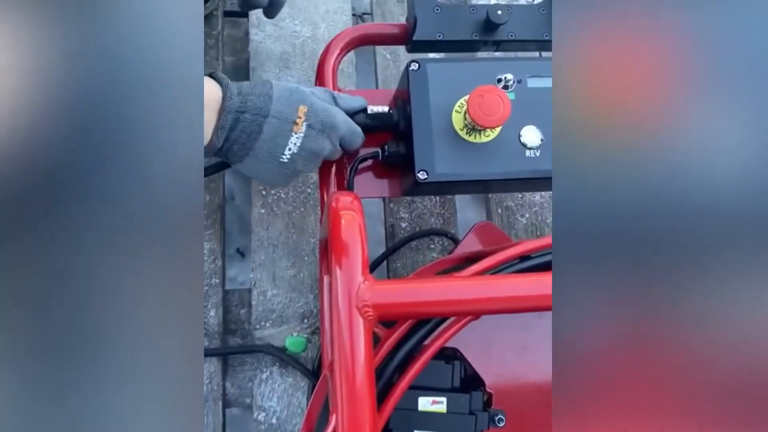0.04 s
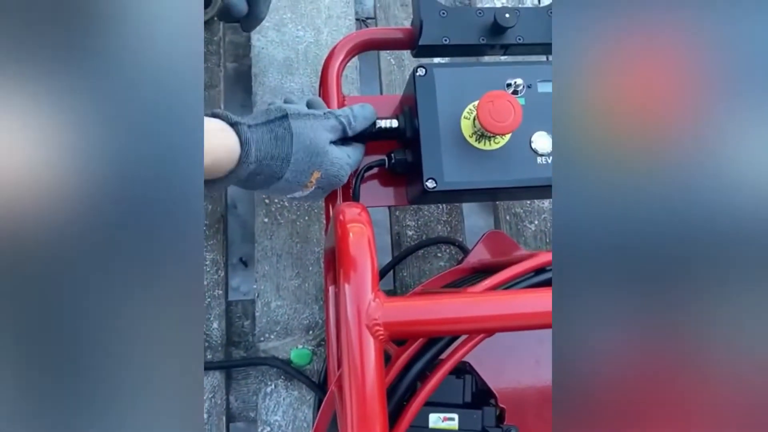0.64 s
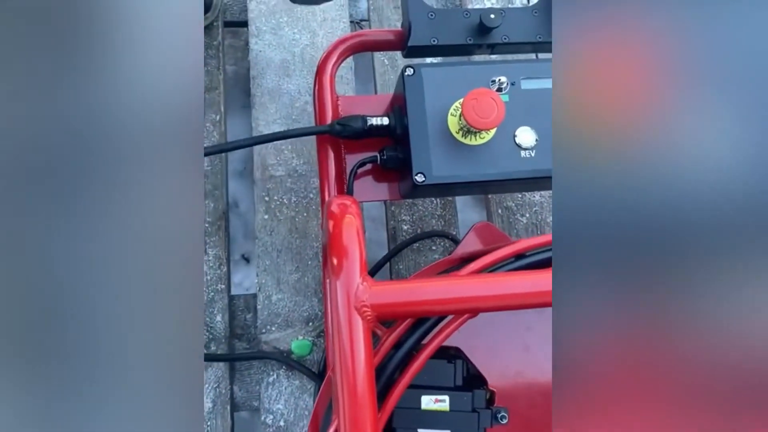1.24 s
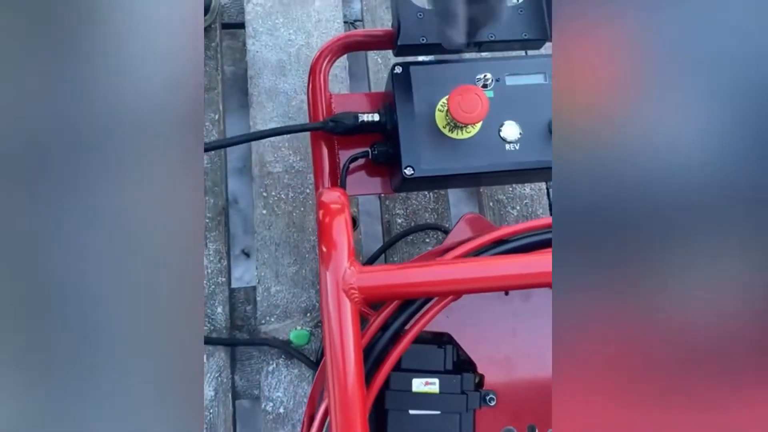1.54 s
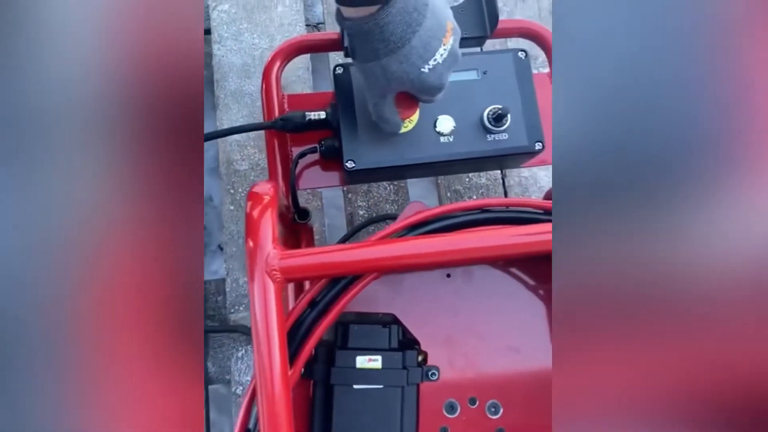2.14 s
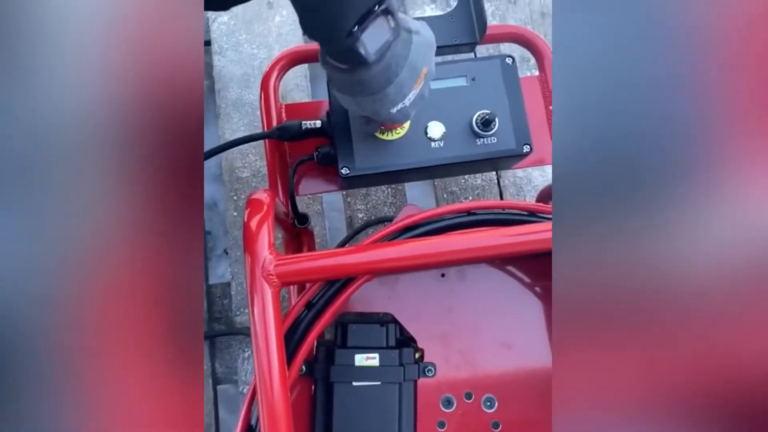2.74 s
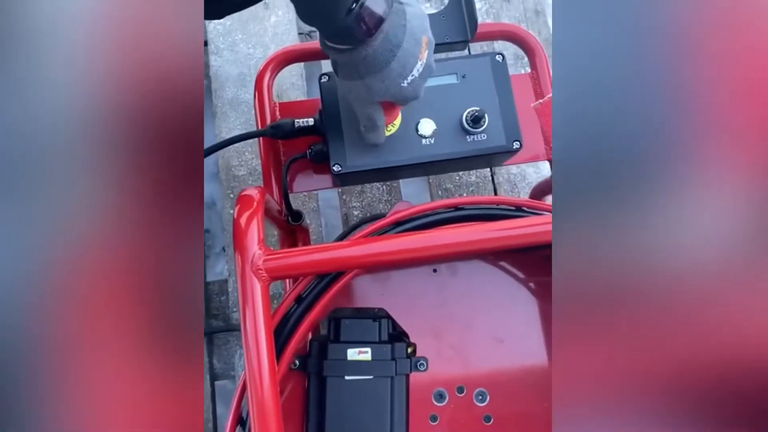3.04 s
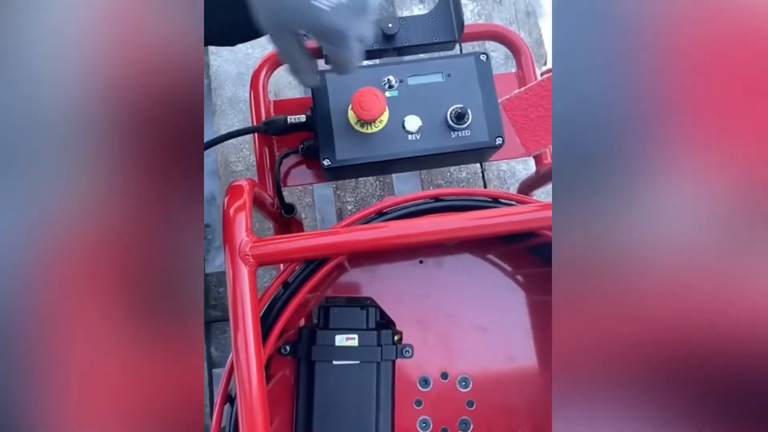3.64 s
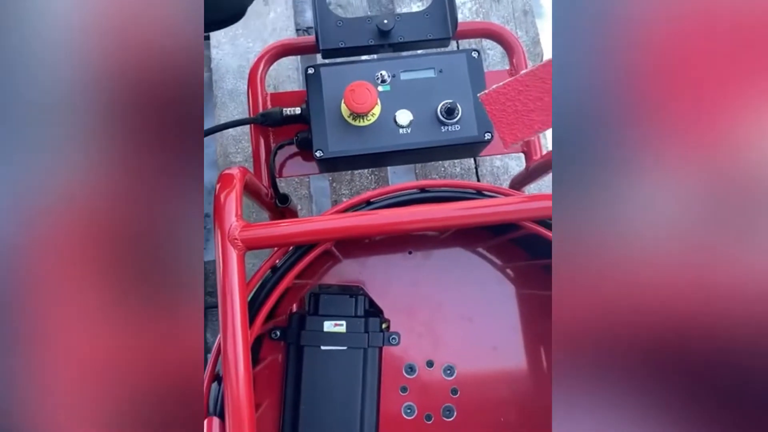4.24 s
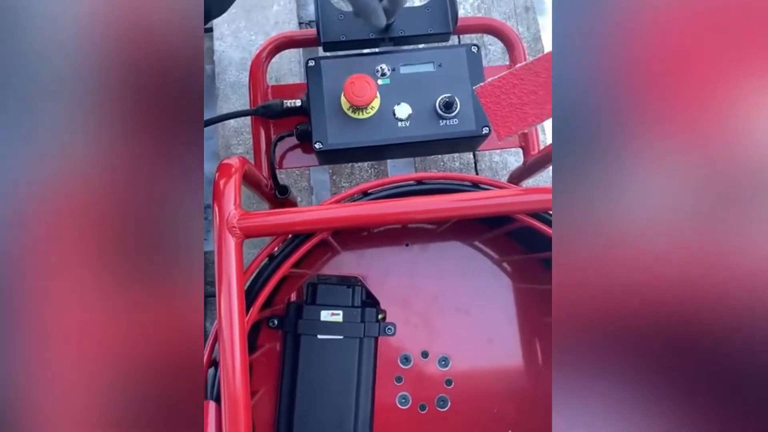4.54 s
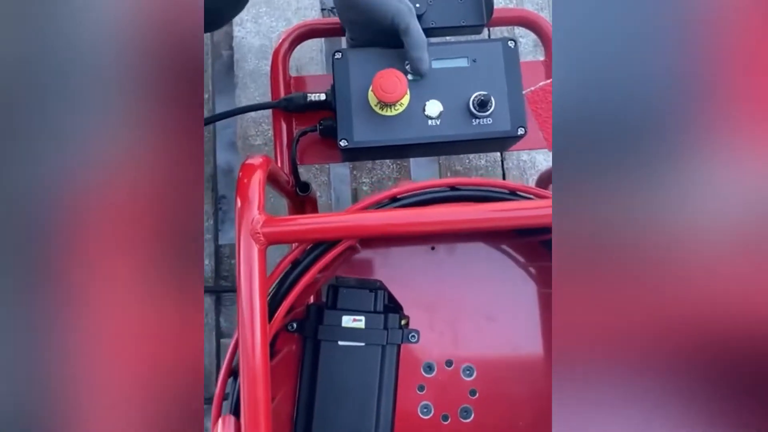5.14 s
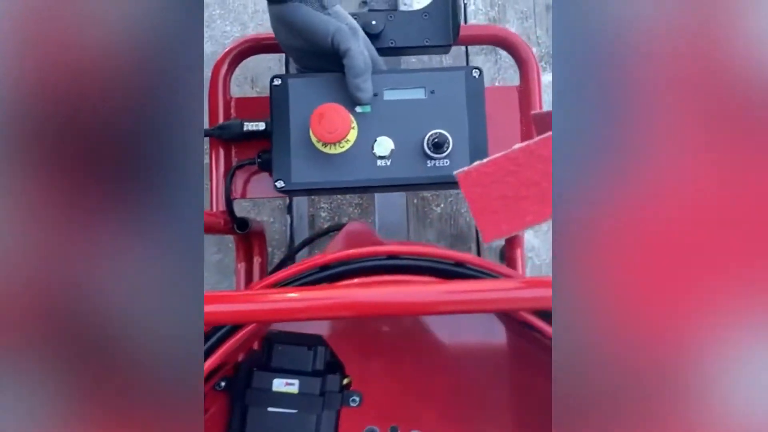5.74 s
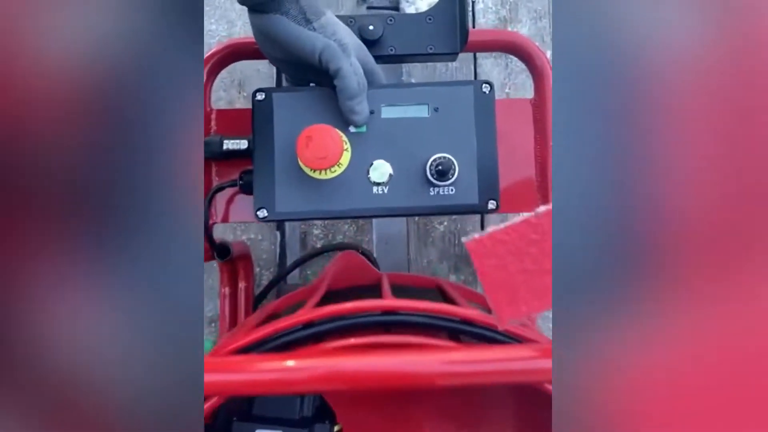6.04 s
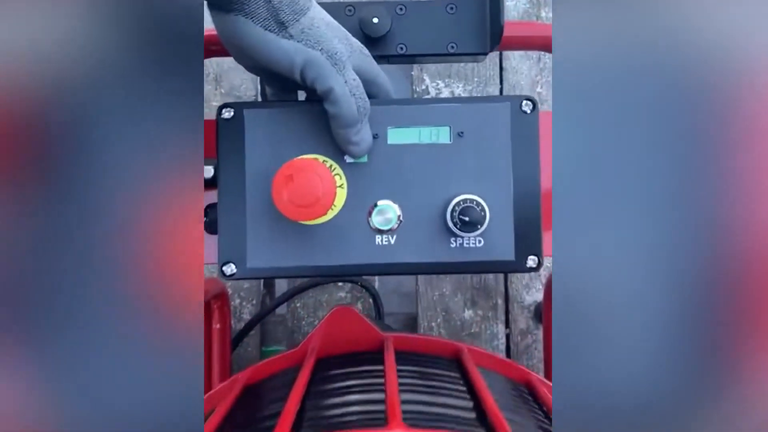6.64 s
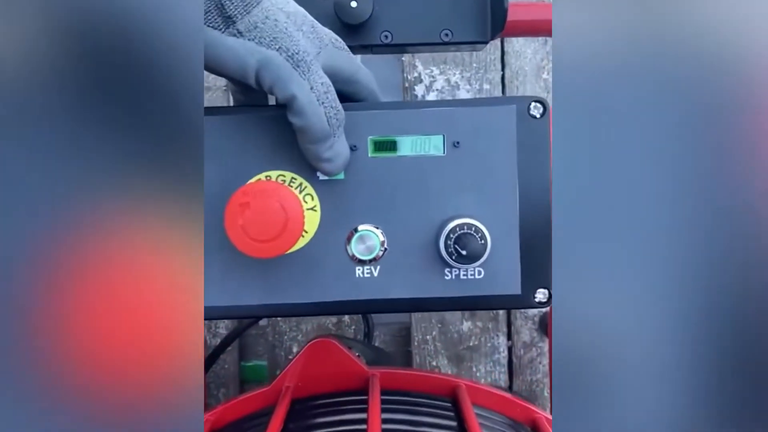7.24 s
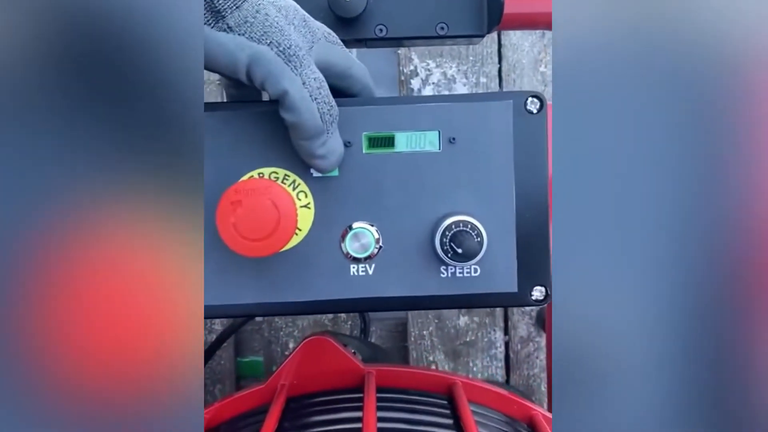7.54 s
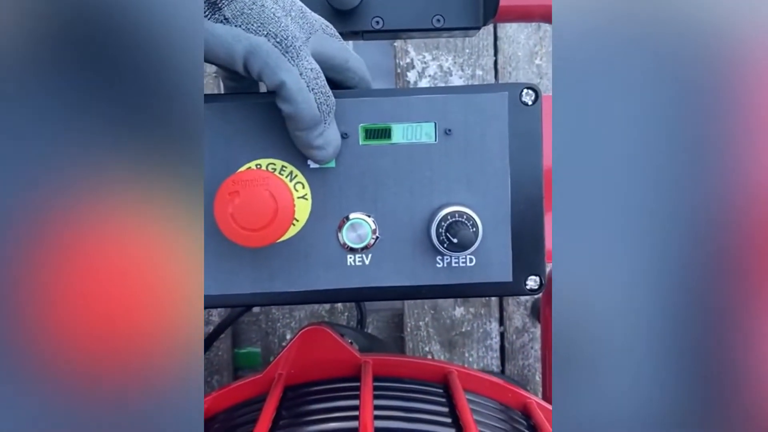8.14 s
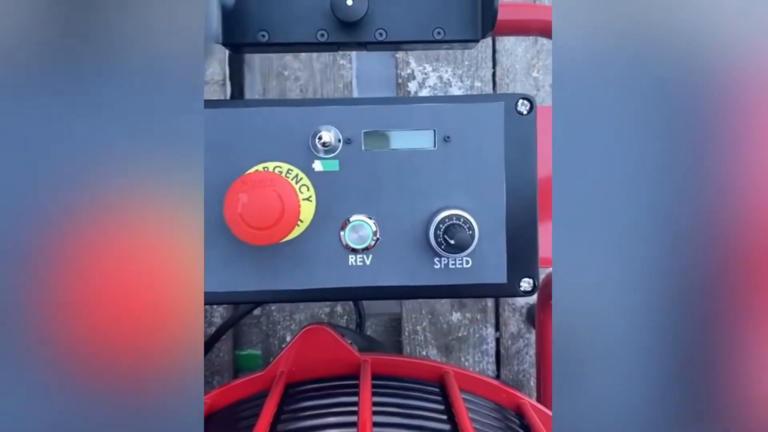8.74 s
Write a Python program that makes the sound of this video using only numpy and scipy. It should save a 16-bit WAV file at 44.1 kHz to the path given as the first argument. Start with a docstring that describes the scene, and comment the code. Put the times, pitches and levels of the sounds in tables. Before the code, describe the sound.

Close up and outdoors, a gloved hand handles a machine's plastic control panel, with soft rustles, fingertip taps and dull bumps. A plug snaps into place first; then a stop button is pushed and twisted loose, giving two sharp, hollow clacks with little ticks around them. The scuffing carries on, dies down briefly, and ends with a switch being pressed and released. A low rumble, hiss and a very faint distant whine lie behind.

```python
"""Outdoors, a gloved hand readies a cable-reel machine whose motor stays off.
First a plug latches into the plastic control box. At 2.6 s the stop button is pushed in, then twisted
free, each clack ringing the box and swaying its steel frame. Glove and sleeve rub and tap on the box,
which knocks dully on the frame. After a lull, at 8.4 s, a power switch is pressed and let go.
Behind it all lie a quiet rumble and hiss, and a faint far whine comes and goes."""
import sys
import numpy as np
from scipy import signal
from scipy.fft import rfft, irfft, next_fast_len
from scipy.io import wavfile

SR = 44100
rng = np.random.default_rng(int(sys.argv[2]) if len(sys.argv) > 2 else 0)


def wrap_up_sound(samples):
    """Save the sound to the file named by the first command line argument, as 16-bit audio."""
    columns = np.atleast_2d(samples).T
    # keep every value between -1 and 1, then stretch to whole-number steps
    tamed = np.clip(columns, -1, 1)
    steps = np.round(tamed * 32767).astype(np.int16)
    wavfile.write(sys.argv[1], SR, steps)


N = 388061
TIME = np.arange(N) / SR


# Modes of the control box. Each row: frequency in Hz, level in dB, decay time (t60) in seconds.
BOX_MODES = [(239, -15.5, 0.043), (346.4, -29.5, 0.16), (528, -28.5, 0.13), (670, -2.5, 0.015),
             (729, -20.5, 0.069), (964, -26, 0.041), (1036, 3.5, 0.00491), (1310, -34.5, 0.18),
             (1462, -28, 0.025), (1770, -0.5, 0.012), (2050, -6, 0.023), (2337, -11.5, 0.015),
             (2783, -23.5, 0.034), (3860, -25, 0.044), (4520, -15.5, 0.0232), (4940, -21, 0.013),
             (5400, -34, 0.06), (6000, -18.5, 0.0052), (8100, -7.5, 0.015), (10100, -5.5, 0.0036)]
# Contacts inside the stop button. Each row: start in seconds, ring in dB, cut-off in Hz, crack in dB.
STOP_CONTACTS = [(2.58807, -16, 9790, -15), (2.5902, 3, 703, -27.5), (2.59279, -12, 1482, -35.5),
                 (2.60664, -16, 611, -44), (3.3035, -27.5, 1217, -46.5), (3.308, -27.5, 1500, -41),
                 (3.31606, -33.5, 11290, -22.5), (3.32086, -1, 2770, -25.5), (3.32567, -37.5, 6270, -29),
                 (3.33938, -35, 1735, -35.5)]

def stop_button():
    """Impact excitation: the button's contacts ring the box; the bass is left to the frame."""
    clacks = mechanism(STOP_CONTACTS, BOX_MODES, crack_t60=0.027, crack_low_hz=1510)
    return butter(clacks, 490, "high")


# Lowest modes of the steel frame. Each row: frequency in Hz, level in dB, t60 in seconds.
FRAME_MODES = [(248, -4.5, 0.056), (336.3, -9, 0.05)]
# Clacks of the stop button taken up by the frame. Each row: start in seconds, peak in dB.
FRAME_SWAYS = [(2.591, -24.5), (3.298, -35), (3.323, -25.5)]

def frame_sway(rise_s):
    """Inertia: the heavy frame is slow to answer, so its low thud swells after the clack."""
    out, thud = np.zeros(N), ring(FRAME_MODES, scatter_db=-1.5)
    thud = peak_one(thud * onset(rise_s, len(thud)))
    for s, db in FRAME_SWAYS:
        add(out, s, from_db(db) * thud)
    return out


# Catches of the stop button's latch as it is pushed, twisted and let go.
# Each row: start in seconds, level in dB, pitch in Hz, bright edge in dB relative to the click.
LATCH_CATCHES = [(2.5877, -20.5, 2550, 2), (2.734, -34.5, 2000, 0.5), (2.843, -43, 1701, -0.5),
                 (2.895, -41.5, 2100, -1), (2.962, -35.5, 1980, -5), (2.994, -38, 1770, -0.5),
                 (3.018, -45.5, 1700, 3), (3.051, -41.5, 2250, -8), (3.091, -44.5, 1716, -1),
                 (3.127, -42.5, 1500, 1.5), (3.185, -39, 2000, -1.5), (3.2656, -24, 1850, -1),
                 (3.285, -42, 1613, 4.5), (3.397, -38, 1750, -2), (3.417, -44.5, 1900, -3),
                 (3.431, -42.5, 2230, -3), (3.579, -36, 2040, -4), (3.597, -39, 1750, 2),
                 (3.622, -30.5, 1950, -6)]

def catches(edge_hz):
    """Damped vibration: each stiff plastic tooth clicks and dies at once; the box answers with a thud."""
    out = np.zeros(N)
    thud = from_db(-3) * padded_thud(hz=280.4, t60=0.029, rise_s=0.0024)
    for s, db, hz, edge_db in LATCH_CATCHES:
        click = burst(hz, width=1.22, t60=.024)
        edge = from_db(edge_db) * burst(edge_hz, width=1.7, t60=.018)
        add(out, s, from_db(db) * (click + edge + thud))
    return out


# Contacts of the plug's latch. Each row: start in seconds, ring in dB, cut-off in Hz, crack in dB.
PLUG_CONTACTS = [(.1935, -25, 6000, -47), (.204, -10.5, 11000, -19.5), (.2062, -6, 8970, -26),
                 (.2076, -4.5, 4970, -19)]
# Modes of the metal plug. Each row: frequency in Hz, level in dB, t60 in seconds before the hand damps it.
PLUG_MODES = [(335, -30, 0.023), (660, -33.5, 0.045), (1300, -21, 0.011), (1820, -20.5, 0.071),
              (2140, -19.5, 0.016), (2820, -28.5, 0.078), (3800, -15.5, 0.027), (4220, -16.5, 0.015),
              (4620, -13.5, 0.025), (4820, -22, 0.017), (5200, -8, 0.016), (5700, -10, 0.013),
              (6120, -9, 0.037), (8000, -5.5, 0.011), (10300, -16, 0.011), (11000, -10, 0.017)]

def plug(grip_t60):
    """Damping: the latch rings the plug, and the hand round it lets no mode outlast grip_t60."""
    held_modes = [(hz, db, min(t60, grip_t60)) for hz, db, t60 in PLUG_MODES]
    return mechanism(PLUG_CONTACTS, held_modes, crack_t60=0.027, crack_low_hz=1100)


# Contacts of the switch, then of its cap. Each row: start in seconds, ring in dB, cut-off in Hz, crack in dB.
PRESS_CONTACTS = [(8.3977, -17, 9170, -38), (8.4008, -30, 8000, -29)]
RELEASE_CONTACTS = [(8.4785, -27.5, 9000, -30)]
# Modes of the switch, then of its cap. Each row: frequency in Hz, level in dB, t60 in seconds.
SWITCH_MODES = [(1466, -9.5, 0.033), (1790, -7, 0.023), (1960, -23, 0.055), (2440, -6, 0.0062),
                (3430, -9, 0.029), (3830, -9.5, 0.02), (5440, -7.5, 0.013), (8330, -6.5, 0.019),
                (9800, 0, 0.0065)]
CAP_MODES = [(2440, -4.5, 0.017), (4580, -5, 0.016)]

def power_switch():
    """Free vibration: the switch rings when pressed, and its cap on landing back on its seat."""
    press = mechanism(PRESS_CONTACTS, SWITCH_MODES, crack_t60=0.0098, crack_low_hz=1430)
    release = mechanism(RELEASE_CONTACTS, CAP_MODES, crack_t60=0.011, crack_low_hz=3000)
    return press + release


def mechanism(contacts, modes, crack_t60, crack_low_hz):
    """Contact stiffness sets bandwidth: sprung parts hit the same stops, and softer hits are duller."""
    out = np.zeros(N)
    response = butter(ring(modes, scatter_db=0), 11000, "low")
    for s, ring_db, soft_hz, crack_db in contacts:
        body = butter(response, soft_hz, "low", order=1)
        snap = butter(crack(crack_t60), crack_low_hz, "high")
        add(out, s, from_db(ring_db) * body + from_db(crack_db) * snap)
    return out


# Fingertips knocking on the box.
# Each row: start in seconds, level in dB, offset of the tick in dB, pitch of the touched spot in Hz.
FINGER_TAPS = [(1.097, -39, -31, 720), (1.534, -25.5, -9, 790), (1.577, -25, -28, 1035),
               (1.601, -23, -25, 807), (1.721, -33, -11.5, 784), (1.872, -21, -17.5, 785),
               (1.913, -33.5, -14, 2240), (2.74, -33, -4, 704), (3.139, -25.5, -20, 730),
               (3.676, -36, -1, 610), (4.374, -25, -35, 612), (4.435, -17, -17, 1185),
               (4.444, -22, -22, 570), (4.908, -23.5, -28, 1226), (5.094, -24.5, -13, 940),
               (5.833, -30.5, -27, 960), (5.874, -29.5, -23, 1103), (6.044, -35, 1.5, 653),
               (8.478, -25, -9.5, 600), (8.667, -32, -6.5, 593), (8.711, -28, -6.5, 635)]

def taps(contact_s, body_db, knock_db, tick_db):
    """Cushioned impact: a gloved touch gives a low body note, a hollow knock and a surface tick."""
    out = np.zeros(N)
    for s, db, tick_offset_db, spot_hz in FINGER_TAPS:
        box = ring(BOX_MODES, scatter_db=-5.5) + from_db(8.5) * crack(t60=0.07)
        spot = ring([(spot_hz, 7.5, 0.042)], scatter_db=0.5)
        landing = 1 - np.exp(-TIME[:len(box)] / contact_s)   # the glove cushions the first instant
        body = butter(box, [130, 400], "band", order=3)
        knock = butter(landing * (box + spot), [450, 2400], "band")
        tick = butter(landing * crack(t60=0.014), 1100, "high")
        tick = butter(tick, 6000, "low", order=1)
        for part, part_db in ((body, body_db), (knock, knock_db), (tick, tick_db + tick_offset_db)):
            add(out, s, from_db(db + part_db) * peak_one(part))
    return out


# Soft bumps against the frame. Each row: start in seconds, peak in dB, pitch in Hz, t60 in seconds.
FRAME_BUMPS = [(1.538, -38, 377, .07), (1.581, -30, 398, 0.079), (1.873, -28.5, 387, 0.041),
               (3.796, -30, 193, 0.056), (3.855, -30.5, 222, 0.39), (3.965, -25.5, 199, 0.15),
               (4.66, -22.5, 165, 0.12), (4.817, -28.5, 161, 0.07), (4.898, -22.5, 183, 0.028),
               (4.924, -15.5, 210, 0.032), (4.942, -33.5, 153, 0.16), (6.368, -39.5, 130, 0.023),
               (8.48, -35.5, 351.6, .06), (8.771, -19.5, 207.6, 0.028)]

def bumps(cushion_s):
    """Damped oscillation: a padded push swells over a few milliseconds and rings away."""
    out = np.zeros(N)
    for s, db, hz, t60 in FRAME_BUMPS:
        add(out, s, from_db(db) * padded_thud(hz, t60, cushion_s))
    return out


# Strokes of glove and sleeve over the box. Each row: fastest moment in seconds, length in seconds,
# level in dB, offset of the box's rumble in dB, offset of the fibres' hiss in dB.
GLOVE_STROKES = [(0.03, 0.36, -52, -9, -3.5), (0.934, 0.19, -45.5, -7.5, -6),
                 (1.247, 0.13, -47.5, -9.5, -6), (1.415, 0.058, -44, -4, -17),
                 (1.533, 0.025, -32.5, -13, -6.5), (1.587, 0.083, -39, 1, -10),
                 (1.722, 0.045, -45.5, 3, -6.5), (2.172, 0.093, -50.5, -2.5, 2),
                 (2.38, 0.14, -46.5, -2.5, -0.5), (2.748, 0.017, -35, -4, -11),
                 (2.825, 0.0071, -39, -12.5, -14.5), (3.334, 0.054, -42.5, 8, -2.5),
                 (3.714, 0.23, -44, -1.5, -3), (3.893, 0.13, -37.5, 0.5, -8),
                 (3.977, 0.039, -29.5, 1.5, -6), (4.443, 0.15, -41.5, 2, -1.5),
                 (4.683, 0.12, -42.5, 1, -6.5), (4.828, 0.061, -38, -3, -5.5),
                 (4.901, 0.028, -37.5, 4.5, -4), (5.092, 0.048, -37.5, 0.5, -5),
                 (5.312, 0.082, -50, -0.5, 5.5), (5.538, 0.14, -47, -2, -1), (5.861, 0.067, -43.5, -2, 0),
                 (6.037, 0.21, -46.5, -1.5, -3), (6.3, 0.2, -52, -1.5, -2),
                 (8.274, 0.028, -49.5, -11.5, -8), (8.386, 0.061, -45.5, -9.5, -7.5),
                 (8.497, 0.091, -47.5, -0.5, -22), (8.76, 0.069, -43.5, 7, -9.5)]
# The sleeve shifts for as long as the arm moves. Each row: time in seconds, level in dB.
SLEEVE_LEVELS = [(0, -77), (.6, -59), (.95, -53.5), (2.0, -52.5), (3.0, -51.5), (4.2, -52.5), (5.5, -52.5),
                 (6.4, -60), (6.95, -58.5), (7.25, -69.5), (7.9, -70), (8.2, -57.5), (8.6, -52.5)]

def rub_strengths():
    """Incoherent sources add in power: sleeve and strokes set the gains of rumble, swish and hiss."""
    sleeve = from_db(np.interp(TIME, *np.transpose(SLEEVE_LEVELS)))
    power = np.outer(from_db([-3, 0, -3.5]), sleeve) ** 2   # rumble, swish, hiss
    for s, length_s, db, rumble_db, hiss_db in GLOVE_STROKES:
        gains = from_db([db + rumble_db, db, db + hiss_db])
        power += np.outer(gains, swell(s, length_s)) ** 2
    return np.sqrt(power)


# Spectrum of the rubbing glove. Each row: frequency in Hz, spectral density in relative dB.
GLOVE_SPECTRUM = [(100, -23), (160, 6.5), (230, 2), (380, 2), (540, -4), (720, -5), (1400, -9), (1900, -8),
                  (2800, -12), (4000, -16), (5200, -17), (7000, -16), (8800, -22), (10700, -23)]

def rubbing(snags_per_s, spread_db, smooth_db, modes_db, shift_db):
    """Sliding friction: fibres snag over a smooth swish; different modes answer as the finger travels."""
    out = np.zeros(N)
    bands = [(130, 450, -3.5), (450, 2500, -6), (2500, 16000, -2.5)]   # rumble, swish, hiss
    for (low_hz, high_hz, band_db), strength in zip(bands, rub_strengths()):
        sizes = from_db(spread_db * np.minimum(rng.exponential(1, N), 4)) * rng.choice([-1, 1], N)
        snags = rms_one(sizes * (rng.random(N) < snags_per_s / SR))
        slips = snags + from_db(smooth_db) * rng.standard_normal(N)
        box = np.zeros(N)
        for hz, _, t60 in BOX_MODES:
            if low_hz < hz < high_hz:
                coupling = from_db(modes_db + shift_db * np.tanh(wander(per_s=22)))
                box += coupling * resonance(slips, hz, t60)
        cloth = butter(colour(slips + box, GLOVE_SPECTRUM), [low_hz, high_hz], "band", order=4)
        out += from_db(band_db) * strength * rms_one(cloth)
    return out


def scuffed(x, patchy_db, patches_per_s):
    """Amplitude modulation: the touching patch of cloth changes, so narrow bands swell and fade apart."""
    edges_hz = np.geomspace(130, 13000, num=27)
    out, size = np.zeros(N), next_fast_len(N)
    spectrum = rfft(x, size)
    band_of_bin = np.digitize(np.fft.rfftfreq(size, 1 / SR), edges_hz)
    for k in range(len(edges_hz) + 1):
        band = irfft(spectrum * (band_of_bin == k), size)[:N]
        out += from_db(patchy_db * wander(patches_per_s)) * band
    return out


# Scrapes as the glove's grip catches and slips.
# Each row: loudest moment in seconds, level in dB, length in seconds, brightest frequency in Hz.
GRIP_SCRAPES = [(1.415, -46, 0.0035, 2650), (1.939, -44.5, 0.007, 1240), (2.047, -44.5, 0.005, 3000),
                (3.731, -51, 0.0071, 3000), (3.902, -52, 0.052, 1980), (4.402, -52, 0.0053, 2200),
                (4.438, -33, 0.005, 1940), (4.608, -44, 0.0074, 1300), (4.749, -41.5, 0.0028, 3300),
                (4.826, -44, 0.013, 3450), (4.885, -44.5, .03, 4560), (4.207, -48.5, 0.0038, 4070),
                (4.57, -46, 0.0053, 3500), (5.079, -44, 0.0067, 3500), (5.11, -42.5, 0.0073, 2400),
                (5.153, -46, 0.0054, 3000), (5.595, -48, 0.038, 3480), (5.822, -39, 0.0091, 3000),
                (5.835, -37.5, 0.0067, 3170), (5.865, -37, 0.0029, 2700), (5.878, -37, 0.0088, 3450)]

def scrapes(slips_per_s, spread_db, width):
    """Irregular stick-slip: a quick run of tiny slips fills a broad band round the brightest pitch."""
    out, t = np.zeros(N), TIME[:8192]
    for s, db, length_s, hz in GRIP_SCRAPES:
        sizes = from_db(spread_db * rng.standard_normal(len(t))) * rng.choice([-1, 1], len(t))
        slips = sizes * (rng.random(len(t)) < slips_per_s / SR)
        rasp = rms_one(butter(slips, [hz / width, hz * width], "band", order=3))
        envelope = np.exp(-2 * (t / length_s - 2) ** 2)
        add(out, s - 2 * length_s, from_db(db) * rasp * envelope)
    return out


# The grip peeling off the plastic. Each row: start in seconds, level in dB, brightest frequency in Hz.
PEEL_TICKS = [(0.164, -35, 8500), (0.68, -41, 6400), (1.026, -36.5, 6800), (1.1808, -36.5, 3000),
              (1.721, -39, 2600), (2.145, -38, 7000), (2.452, -35.5, 6000), (3.749, -31.5, 3000),
              (3.817, -40, 2800), (3.963, -26, 5030), (3.975, -25.5, 6000), (3.9805, -24, 4080),
              (3.991, -34, 3500), (4.0057, -26.5, 2560), (4.376, -50, 2500), (4.436, -34, 3000),
              (5.094, -42, 2000), (5.337, -33.5, 5440), (5.779, -38, 3780), (6.018, -44, 4500),
              (6.375, -29.5, 6000), (6.381, -42, 7500), (6.589, -40, 5470), (6.892, -43.5, 3000),
              (6.926, -44, 4500), (8.343, -41, 1596), (8.713, -36, 3000)]

def ticks():
    """Release of adhesion: the grip lets go too lightly to move the box, so only a dry snap sounds."""
    out = np.zeros(N)
    for s, db, hz in PEEL_TICKS:
        add(out, s, from_db(db) * burst(hz, width=1.7, t60=.018))
    return out


# Faint squeaks of the power switch's spring as it is pressed and let go. # Each row: loudest moment in seconds,
# length in seconds, pitch in Hz, level in dB.
SPRING_SQUEAKS = [(8.279, 0.0088, 1870, -48), (8.417, 0.029, 1910, -53)]

def squeaks(waver):
    """Periodic stick-slip: the switch's spring grips and slides fast enough to give a brief, unsteady pitch."""
    uneven_time = np.cumsum(1 + waver * wander(per_s=360)) / SR
    return sum(from_db(db) * swell(s, length_s) * np.sqrt(2) * np.sin(2 * np.pi * hz * uneven_time)
               for s, length_s, hz, db in SPRING_SQUEAKS)


# Swells of a far whine. Each row: loudest moment in seconds, length in seconds, pitch in Hz,
# glide in Hz per second, level in dB.
WHINE_SWELLS = [(2.993, 0.19, 433, 2.5, -58), (4.029, 0.16, 448.5, 19, -52.5), (5.87, 0.13, 446, -91, -54),
                (6.423, 0.3, 434.7, 36, -56.5)]

def far_whine(waver_hz):
    """Frequency modulation: a thin tone glides a little and wavers after its long way through the air."""
    waver = waver_hz * rms_one(butter(rng.standard_normal(N), 24.99, "low"))
    out = np.zeros(N)
    for s, length_s, hz, glide, db in WHINE_SWELLS:
        pitch = hz + glide * (TIME - s) + waver
        tone = np.sqrt(2) * np.sin(2 * np.pi * np.cumsum(pitch) / SR)
        out += from_db(db) * swell(s, length_s) * tone
    return out


# Steady background rumble and hiss. Each row: frequency in Hz, spectral density in relative dB.
BACKGROUND_SPECTRUM = [(22, -26.5), (35, -4.5), (55, 1.5), (90, -4.5), (150, -18), (400, -16), (900, -26),
                       (1500, -37.5), (2800, -28.5), (4000, -27.5), (5500, -19.5), (7000, -27),
                       (8800, -37.5), (10700, -29.5)]

def rumble_and_hiss(level_db, apart_db):
    """Partial coherence: the steady background differs slightly between left and right."""
    shared, own = rng.standard_normal(N), rng.standard_normal((2, N))
    return from_db(level_db) * rms_one(colour(shared + from_db(apart_db) * own, BACKGROUND_SPECTRUM))


# Colour of the echoes. Each row: frequency in Hz, gain in dB.
ECHO_SPECTRUM = [(150, -0.5), (270, 4), (520, 16), (1200, 13.5), (2200, 12.5), (5000, 15), (7200, -5.5),
                 (11000, -15)]

def echoes(x, early_db, early_t60, late_db, late_t60):
    """Reflection: quick scatter from frame and decking, then a faint tail from the surroundings."""
    size = SR // 2
    early = from_db(early_db) * rms_one(dying(early_t60, size))
    late = from_db(late_db) * rms_one(dying(late_t60, size))
    envelope = (early + late) * onset(0.0027, size) / np.sqrt(size)
    response = colour(envelope * rng.standard_normal((2, size)), ECHO_SPECTRUM)
    return signal.fftconvolve(x[None], response, axes=1)[:, :N]


# Phase between the ports, for snaps and for soft sounds. Each row: frequency in Hz, left lead in radians.
SNAP_LEAD = [(0, 0), (700, .3), (1300, -.2), (2400, .3), (3000, 1.2), (4000, 1.3), (5000, 0), (6000, 1.5),
             (7000, 2.9), (8000, 3.9), (9000, 4.6), (10000, 6.2), (12000, 7.2)]
SOFT_LEAD = [(0, 0), (250, .1), (800, .75), (1600, .1), (2900, 1.1), (4000, .5), (5400, .15), (6500, 3.1),
             (8300, 3.3), (9400, 6.2), (12000, 6.4)]
# Balance between the ports, likewise. Each row: frequency in Hz, left minus right in dB.
SNAP_LEAN = [(300, -1), (1000, 6.5), (1500, 0), (3000, 2), (4100, -9), (5300, 3.5), (9000, 1.5)]
SOFT_LEAN = [(100, 1), (300, -3), (600, -1.5), (1200, 6), (1700, 1), (2500, -1), (4000, -1), (6000, 1),
             (12000, 0.5)]

def ports(x, phase, balance):
    """Path difference: a sound's direction sets its phase and level at the two microphone ports."""
    size = next_fast_len(N + 4096)
    hz = np.fft.rfftfreq(size, 1 / SR)
    left, right = rfft(x, size)
    lean = from_db(at_hz(balance, hz) / 2)
    lag = np.exp(-1j * np.interp(hz, *np.transpose(phase)))
    return irfft(np.array([left * lean, right * lag / lean]), size)[:, :N]


def ring(modes, scatter_db):
    """Modal superposition: a touched body sounds all its modes, neighbours swinging in opposite senses."""
    out = 0
    for k, (hz, db, t60) in enumerate(modes):
        strength = (-1) ** k * from_db(db + scatter_db * rng.normal())
        fade = dying(t60)
        out += strength * fade * np.cos(2 * np.pi * hz * TIME[:len(fade)])
    return butter(out, 80, "high")   # small parts radiate little bass


def crack(t60):
    """Modal overlap: the countless short-lived modes of a contact merge into a burst of noise."""
    fade = dying(t60)
    return fade * rng.standard_normal(len(fade))


def burst(hz, width, t60):
    """Transient response: a contact rings a cluster of damped modes within a ratio `width` of one pitch."""
    fade = dying(t60)
    return fade * rms_one(butter(rng.standard_normal(len(fade)), [hz / width, hz * width], "band"))


def padded_thud(hz, t60, rise_s):
    """A damped sinusoid with a soft onset and peak 1."""
    fade = dying(t60)
    return peak_one(fade * onset(rise_s, len(fade)) * np.sin(2 * np.pi * hz * TIME[:len(fade)]))


def resonance(x, hz, t60):
    """Forced vibration: one mode acts as a band-pass with peak gain 1."""
    radius = np.exp(-np.log(1000) / (t60 * SR))
    feedback = [1, -2 * radius * np.cos(2 * np.pi * hz / SR), radius ** 2]
    return signal.lfilter(np.array([1, 0, -1]) * (1 - radius ** 2) / 2, feedback, x)


def dying(t60, size=8192):
    """Exponential decay from 1, by 60 dB in t60 seconds."""
    return from_db(-60 * TIME[:size] / t60)


def onset(rise_s, size):
    """Gaussian rise from 0 towards 1."""
    return 1 - np.exp(-(TIME[:size] / rise_s) ** 2)


def swell(s, length_s, rise_share=0.43):
    """A skewed bell envelope that reaches 1 at time s."""
    out = np.zeros(N)
    near = slice(*np.searchsorted(TIME, [s - 4 * length_s, s + 4 * length_s]))
    away = np.maximum((s - TIME[near]) / rise_share, (TIME[near] - s) / (1 - rise_share)) / length_s
    out[near] = np.exp(-.5 * away ** 1.87)   # a power of 1 is pointed, 2 is rounded
    return out


def wander(per_s):
    """Linear interpolation between random values of spread 1."""
    knots = rng.standard_normal(4096)
    return np.interp(TIME * per_s, np.arange(len(knots)), knots)


def colour(x, spectrum):
    """Zero-phase filtering by a curve of (Hz, dB) points."""
    size = next_fast_len(x.shape[-1])
    gain = from_db(at_hz(spectrum, np.fft.rfftfreq(size, 1 / SR)))
    return irfft(rfft(x, size) * gain, size)[..., :x.shape[-1]]


def at_hz(points, hz):
    """Interpolation on a log-frequency axis."""
    f, value = np.transpose(points)
    return np.interp(np.log(hz + 1), np.log(f + 1), value)


def butter(x, hz, kind, order=2):
    """Causal low-, high- or band-pass."""
    sections = signal.butter(order, np.clip(hz, 10, .45 * SR), kind, fs=SR, output="sos")
    return signal.sosfilt(sections, x + 1e-18)


def add(out, s, sound):
    """Superpose a short sound at time s."""
    start = max(round(s * SR), 0)
    out[start:start + len(sound)] += sound[:N - start]


def from_db(db):
    """Decibels to gain."""
    return np.exp(np.asarray(db) * np.log(10) / 20)


def rms_one(x):
    """Scale to rms 1."""
    return x / np.sqrt(np.mean(x ** 2) + 1e-20)


def peak_one(x):
    """Scale to peak 1."""
    return x / np.abs(x).max()


def scene():
    """Superposition: hard snaps and soft handling, each with its echoes, add to the quiet background."""
    snaps = stop_button() + plug(grip_t60=.035) + power_switch() + frame_sway(rise_s=0.031)
    snaps = snaps + echoes(snaps, early_db=-20, early_t60=.045, late_db=-35, late_t60=.3)
    clicks = catches(edge_hz=4200) + ticks()
    clicks = clicks + echoes(clicks, early_db=-23, early_t60=.035, late_db=-36, late_t60=.2)
    knocks = taps(contact_s=0.0013, body_db=-8, knock_db=-2.5, tick_db=6.5) + bumps(cushion_s=0.0033)
    glove = rubbing(snags_per_s=330, spread_db=4.2, smooth_db=1, modes_db=-6.5, shift_db=11)
    glove = scuffed(glove, patchy_db=2, patches_per_s=34)
    glove *= from_db(2.2 * wander(per_s=110))   # the glove grips and slides by fits
    grip = scrapes(slips_per_s=2500, spread_db=4, width=1.65) + squeaks(waver=0.0085)
    handling = knocks + glove + grip
    handling = handling + echoes(handling, early_db=-18.5, early_t60=.045, late_db=-29, late_t60=.3)
    # cloth radiates from all round the hand
    scatter = echoes(glove, early_db=-21, early_t60=.02, late_db=-35, late_t60=.2)
    background = far_whine(waver_hz=3.3) + rumble_and_hiss(level_db=-55, apart_db=-25.5)
    soft = handling + clicks + scatter + background
    return ports(snaps, SNAP_LEAD, SNAP_LEAN) + ports(soft, SOFT_LEAD, SOFT_LEAN)


def record(dry):
    """Band limiting and saturation: treble is cut above about 12 kHz and the loudest peaks are rounded."""
    dulled = colour(dry, [(11400, 0), (12300, -22)])
    rounded = .95 * np.tanh(dulled / .95)
    top_cut = signal.ellip(6, .3, 60, 12200, fs=SR, output="sos")
    return signal.sosfilt(top_cut, rounded)


dry = scene()
out = record(dry)
wrap_up_sound(out)
```